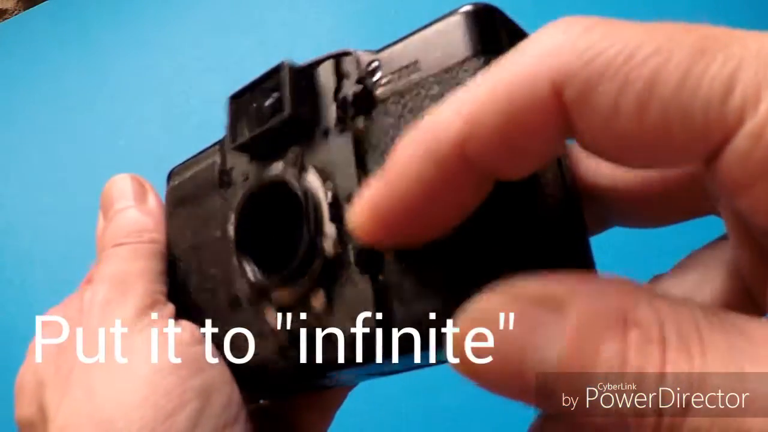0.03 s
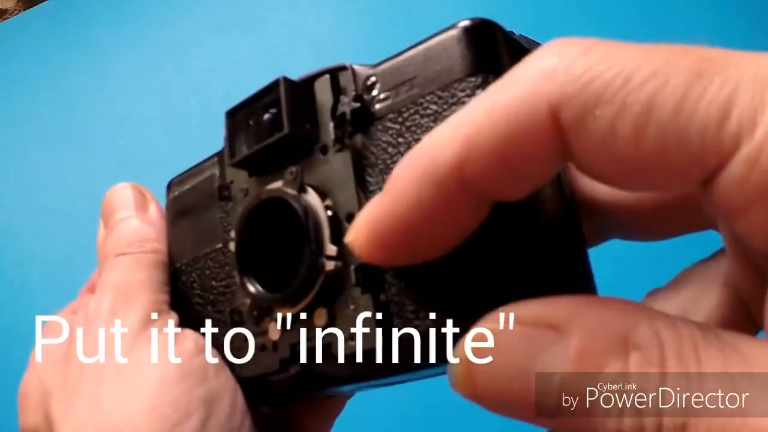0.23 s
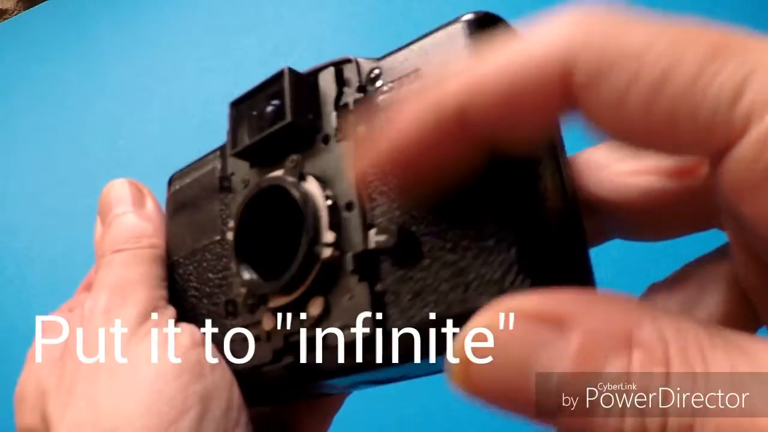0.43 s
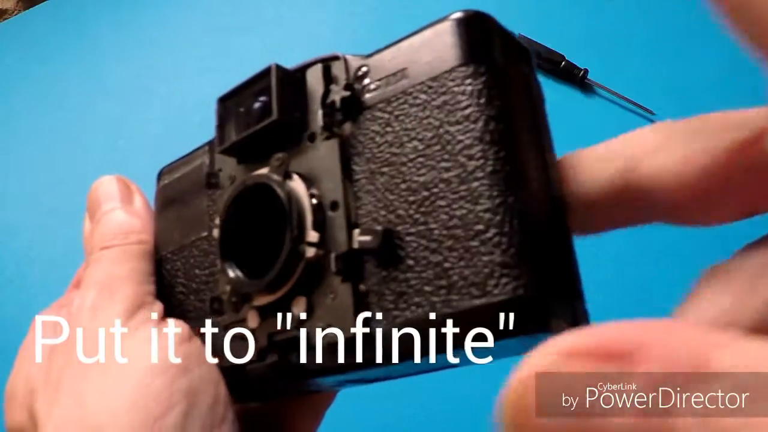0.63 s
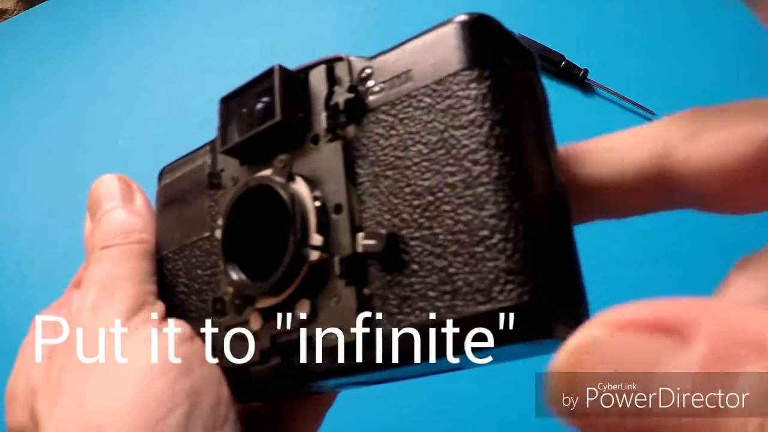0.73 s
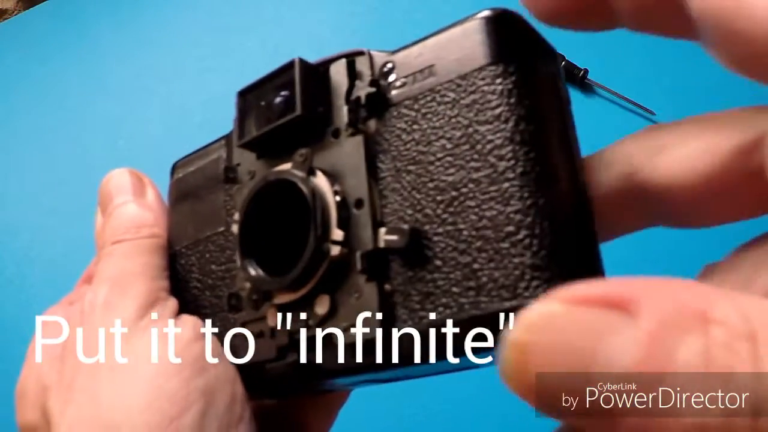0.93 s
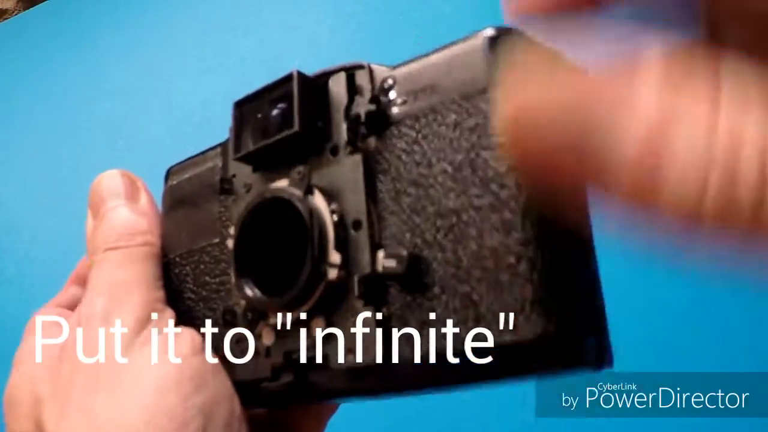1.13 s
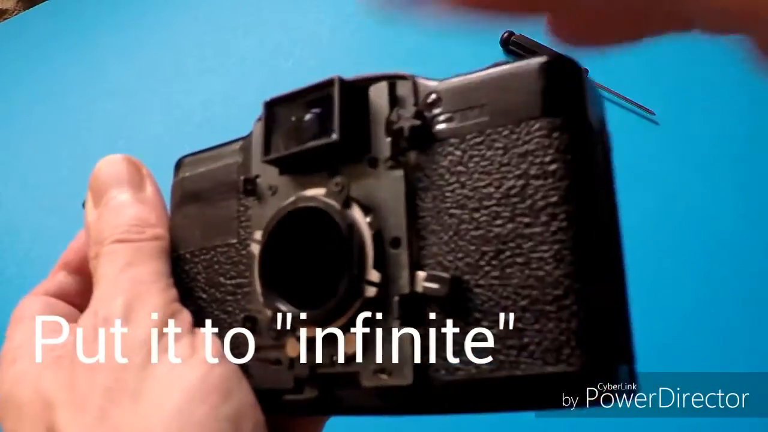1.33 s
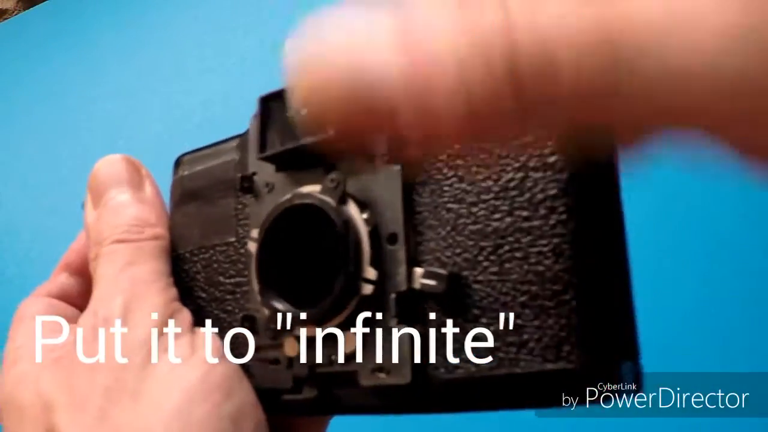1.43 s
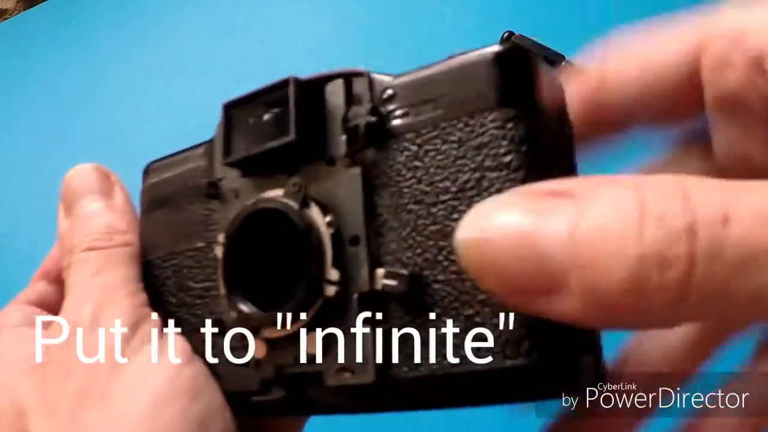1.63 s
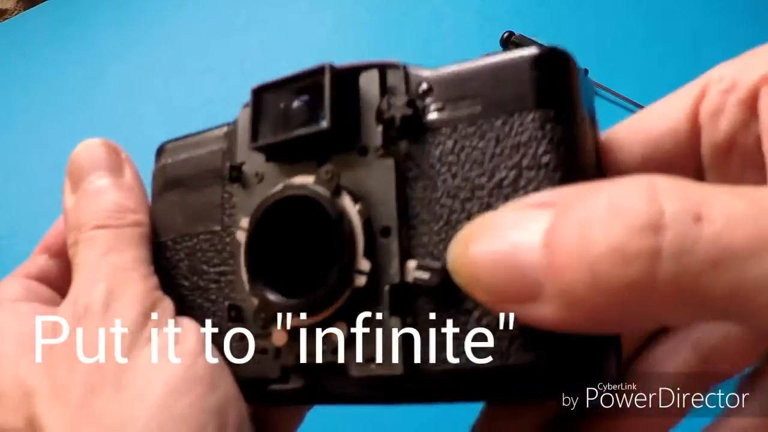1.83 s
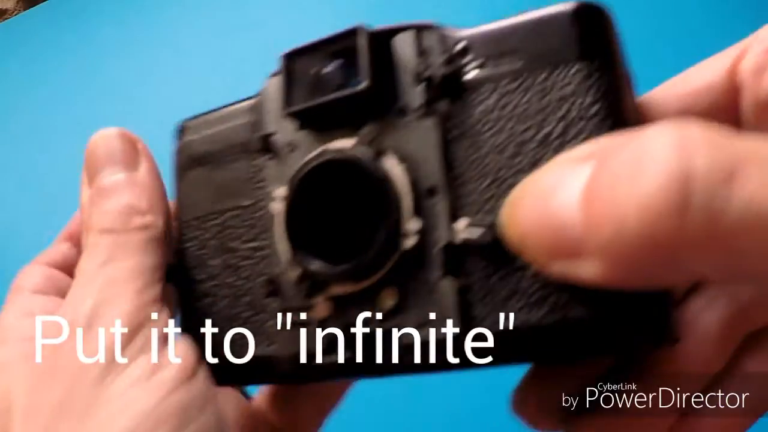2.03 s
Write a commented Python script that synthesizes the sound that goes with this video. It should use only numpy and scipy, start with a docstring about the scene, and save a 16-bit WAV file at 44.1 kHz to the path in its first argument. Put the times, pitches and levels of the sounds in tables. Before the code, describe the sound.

A small metal camera lever ticks softly, then snaps against its stop over quiet hiss.

```python
"""A small metal focus lever on a hand-held compact camera is pushed over: it slips out of one detent
with a soft tick, then snaps against its stop. Each contact rings the lever and the camera body,
and a small room answers. Fingers rub on the case just before the tick and shift again later.
A low hum, likely a distant motor, runs under quiet room hiss."""
import sys
import numpy as np
from scipy import signal
from scipy.fft import rfft, irfft, next_fast_len
from scipy.io import wavfile
from scipy.ndimage import map_coordinates

SR = 44100
rng = np.random.default_rng(int(sys.argv[2]) if len(sys.argv) > 2 else 0)


def dump(signal):
    """Clip the signal to [-1, 1] and save it as 16-bit WAV at the path in sys.argv[1]."""
    limited = np.clip(np.atleast_2d(signal).T, -1, 1)
    pcm = np.round(limited * 32767).astype(np.int16)
    wavfile.write(sys.argv[1], SR, pcm)


N = 92610


def amp(db):
    """Decibels to gain."""
    return 10 ** (np.asarray(db) / 20)


def unit_rms(x):
    """Scale to rms 1."""
    return x / np.sqrt(np.mean(x ** 2) + 1e-20)


def unit_energy(x):
    """Scale to energy 1."""
    return x / np.linalg.norm(x)


def along(points, hz):
    """Interpolate (f/Hz, value) points on a log axis."""
    f, v = np.transpose(points)
    return np.interp(np.log(hz + 1), np.log(f + 1), v)


def wobble(rate_hz):
    """Smooth random curve through knots at rate_hz."""
    knots = rng.standard_normal(int(N * rate_hz / SR) + 4)
    return map_coordinates(knots, [np.arange(N) * rate_hz / SR])


def coloured(x, db_at):
    """Minimum-phase filter with gain db_at(hz)."""
    m = 2 * next_fast_len(len(x))
    gain = amp(db_at(np.fft.rfftfreq(m, 1 / SR)))
    cepstrum = irfft(np.log(np.maximum(gain, 1e-6)), m)
    cepstrum[1:m // 2] *= 2
    cepstrum[m // 2 + 1:] = 0
    return irfft(rfft(x, m) * np.exp(rfft(cepstrum)), m)[:len(x)]


def burst(t, decay_s):
    """Decaying white noise, energy 1."""
    fade = amp(-60 * t / decay_s)
    spectrum = rfft(rng.standard_normal(len(t)) * fade)
    white = irfft(spectrum / (abs(spectrum) + 1e-12), len(t))
    return unit_energy(white * np.sqrt(fade))


# room noise spectrum: f/Hz, level/dB
HISS_SPECTRUM = [(10, -9.5), (28, -1), (60, -7.5), (100, -9.5), (170, -15), (260, -15.5), (400, -22),
                 (600, -23), (950, -28.5), (2000, -30.5), (5000, -32.5), (8000, -38.5), (15000, -41.5)]


def hiss(level_db=-59):
    """Steady room rumble and hiss."""
    noise = coloured(rng.standard_normal(N + SR), lambda hz: along(HISS_SPECTRUM, hz))
    return amp(level_db) * unit_rms(noise[SR:])


# second shaft order: t/s, level/dB
HUM_SECOND_ORDER = [(0, -58), (.4, -65), (.7, -60.5), (1.0, -57), (1.5, -57.5), (1.85, -52.5), (2.1, -57)]
# higher orders: multiple of shaft rate, level/dB
HUM_HIGHER_ORDERS = [(3, -70.5), (6, -77.5), (7, -84.5)]


def hum(shaft_hz=66.41, waver_db=.5, drift_rad=.06):
    """Low hum, likely a distant motor; its strong second order slowly swells."""
    t, out = np.arange(N) / SR, np.zeros(N)
    second_db = np.interp(t, *np.transpose(HUM_SECOND_ORDER))
    for order, db in [(2, second_db)] + HUM_HIGHER_ORDERS:
        peak = np.sqrt(2) * amp(db + waver_db * wobble(5.83))
        phase = 2 * np.pi * (order * shaft_hz * t + rng.random())
        out += peak * np.sin(phase + drift_rad * wobble(5.4))
    return out


# finger rubs: mid t/s, length/s, level/dB, centre f/Hz
FINGER_RUBS = [(0.044, 0.014, -65, 2860), (1.59, 0.029, -75.5, 596), (1.836, 0.045, -66, 620),
               (1.92, 0.042, -64.5, 600), (2.062, 0.014, -63, 766)]


def fingers(width_oct=.31):
    """Skin slides over the case in short, soft swells of band noise."""
    t, out = np.arange(N) / SR, np.zeros(N)
    for mid_s, length_s, db, centre_hz in FINGER_RUBS:
        band_db = lambda hz: -20 * np.log10(1 + (np.log2((hz + 1) / centre_hz) / width_oct) ** 2)
        rub = unit_rms(coloured(rng.standard_normal(N), band_db))
        swell = np.exp(-2 * ((t - mid_s) / length_s) ** 2)
        out += amp(db) * rub * swell
    return out


# room tail spectrum: f/Hz, level/dB
TAIL_SPECTRUM = [(500, 0.5), (1200, -8), (2000, -0.5), (2700, -9), (3300, -1), (4700, -10), (5700, 1),
                 (6400, -2.5), (7600, -5.5), (10000, 5.5), (14000, -3.5)]
# room tail decay: f/Hz, t60/s
TAIL_DECAY = [(500, 0.19), (3000, 0.2), (6300, 0.2), (10000, 0.15), (15000, 0.14)]


def room(x, tail_db=-11.5, near_db=-17):
    """Quick scatter from hands and table, then the short tail of a small room."""
    def reflect(response, delay_s):
        delayed = np.pad(unit_energy(response), (round(delay_s * SR), 0))
        return signal.fftconvolve(x, delayed)[:N]

    hz, t, noise = signal.stft(rng.standard_normal(SR // 2), SR, nperseg=256)
    envelope_db = along(TAIL_SPECTRUM, hz)[:, None] - 60 * t / along(TAIL_DECAY, hz)[:, None]
    tail = signal.istft(noise * amp(envelope_db), SR, nperseg=256)[1]
    near = burst(np.arange(SR // 5) / SR, decay_s=.045)
    return amp(tail_db) * reflect(tail, delay_s=.004) + amp(near_db) * reflect(near, delay_s=.003)


# lever and body modes: f/Hz, level at detent/dB, level at stop/dB, t60/s
MODES = [(604, -39, -36, .08), (850, -13, -33, 0.043), (1141, -18, -21.5, 0.039), (1334, -7.5, -20, 0.026),
         (1656, -7, -22.5, .014), (2386, -7, -9.5, .018), (2625, -1, -6.5, .016), (2810, 4, -9, 0.0098),
         (3274, -29, -23.5, 0.069), (4150, -5.5, -24, 0.046), (4580, -16, -0.5, 0.01),
         (4960, -13, -8, 0.0076), (5450, -28, -19.5, 0.064), (5910, -11, -5.5, 0.015),
         (6220, -12.5, -2, 0.0098), (6480, -27, -31, 0.1), (7050, -19, -3, 0.011), (7670, -24, -7, 0.01),
         (11450, -10, -20, 0.012), (12500, -27, -8, 0.011), (14550, -3, -16, 0.008)]


def camera_ring(t, part, scatter_db=.2):
    """Damped modes of lever and body; the part struck sets their mix."""
    ring = np.zeros(len(t))
    for hz, detent_db, stop_db, t60_s in MODES:
        db = (stop_db if part == "stop" else detent_db) - scatter_db * rng.standard_normal()
        ring += amp(db - 60 * t / t60_s) * np.sin(2 * np.pi * (hz * t + rng.random()))
    return ring


# contact noise spectrum: f/Hz, level/dB
CRUNCH_SPECTRUM = [(200, -22), (600, -19), (1200, -13), (1850, -18), (2600, 0), (3500, -3.5), (4700, 1),
                   (7300, -1.5), (8600, -4.5), (12500, -6), (15000, -11.5)]
# lever contacts: t/s, level/dB, crunch decay/s, crunch tilt above 1 kHz/(dB/oct), part struck
CONTACTS = [(.0623, -29, 0.0096, -0.5, "detent"), (.0640, -23.5, 0.0088, -3, "detent"),
            (0.0654, -19.5, 0.0037, -5.5, "detent"), (0.1326, -15, 0.021, -1, "stop"),
            (0.1363, -4.5, 0.0043, 0, "stop"), (0.1454, -28.5, 0.0034, 2, "stop")]


def lever(rise_s=.00033, jolt_hz=85.5, jolt_db=-36, jolt_t60_s=.04):
    """Each contact gives a crunch and a ring of equal energy and jolts the camera in the hand."""
    t, out = np.arange(SR // 5) / SR, np.zeros(N + SR)
    rise = 1 - np.exp(-t / rise_s)
    jolt = amp(jolt_db - 60 * t / jolt_t60_s) * np.sin(2 * np.pi * jolt_hz * t)
    for start_s, db, decay_s, tilt_db_oct, part in CONTACTS:
        ring = rise * camera_ring(t, part)
        crunch_db = lambda hz: along(CRUNCH_SPECTRUM, hz) + tilt_db_oct * np.log2(np.maximum(hz / 1e3, 1))
        crunch = coloured(rise * burst(t, decay_s), crunch_db)
        click = unit_energy(ring) + unit_energy(crunch)
        out[round(start_s * SR):][:len(t)] += amp(db) * (click + jolt)
    return out[:N]


def scene():
    """Lever in its room, fingers and background; mono."""
    clicks = lever()
    return (clicks + room(clicks) + fingers() + hum() + hiss())[None]


def record(dry):
    """Steep low-pass."""
    cutoff_hz = 15300
    m = next_fast_len(N + SR // 2)
    hz = np.fft.rfftfreq(m, 1 / SR)
    return irfft(rfft(dry, m) / np.sqrt(1 + (hz / cutoff_hz) ** 240), m)[:, :N]


dry = scene()
out = record(dry)
dump(out)
```